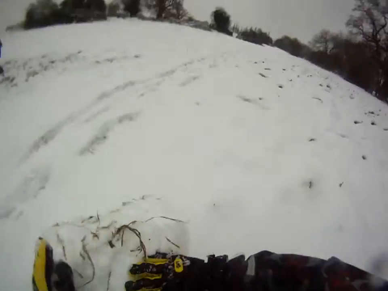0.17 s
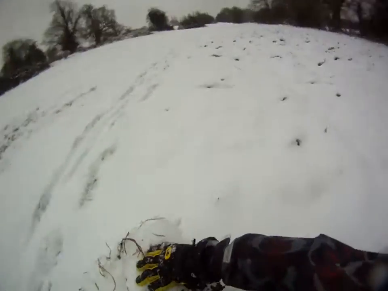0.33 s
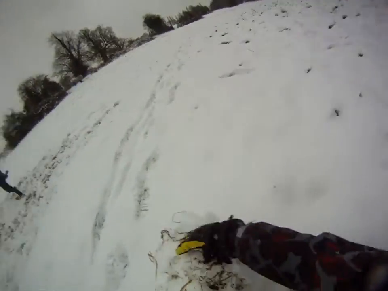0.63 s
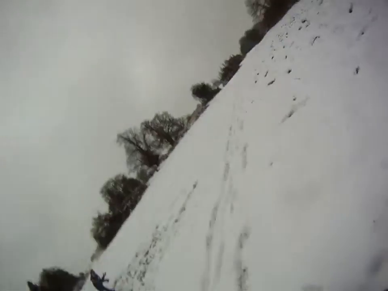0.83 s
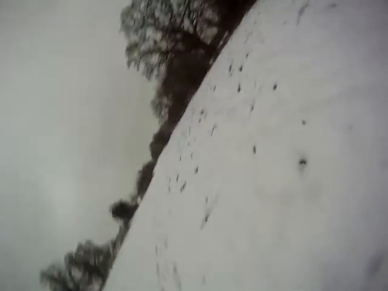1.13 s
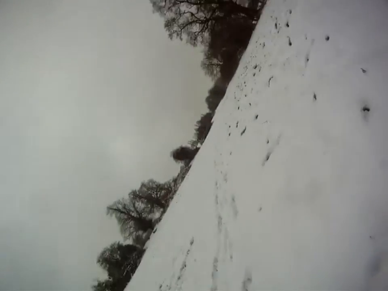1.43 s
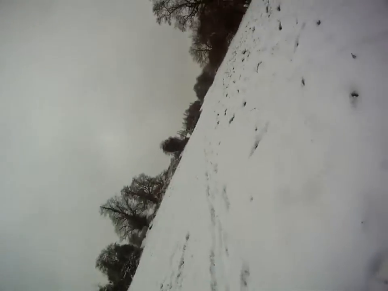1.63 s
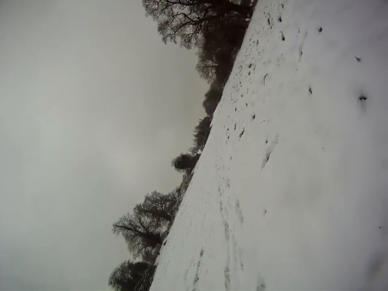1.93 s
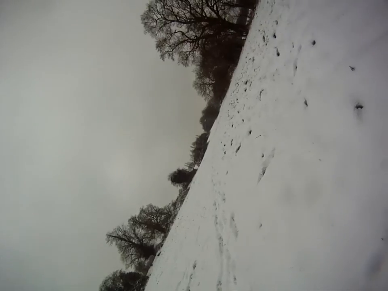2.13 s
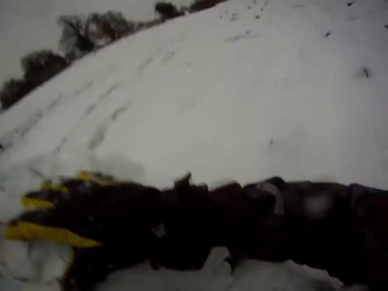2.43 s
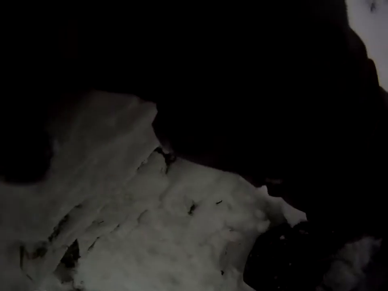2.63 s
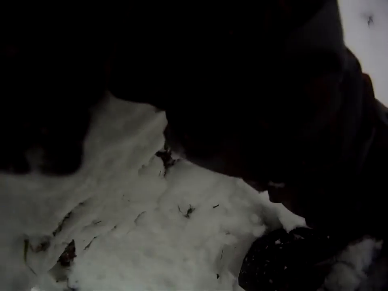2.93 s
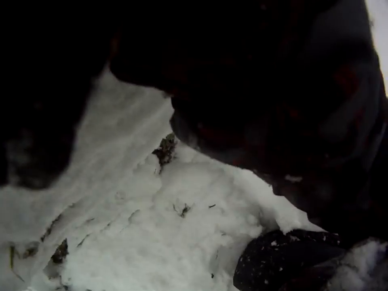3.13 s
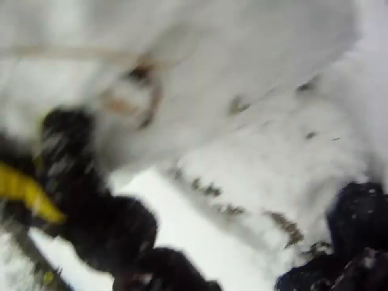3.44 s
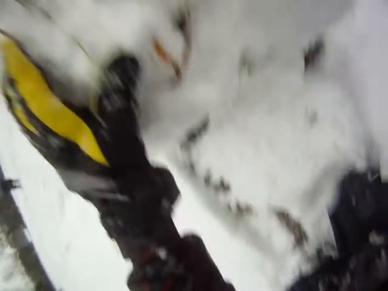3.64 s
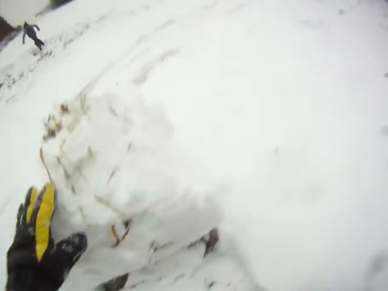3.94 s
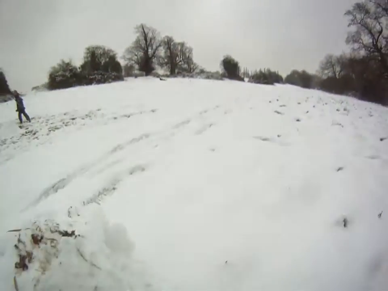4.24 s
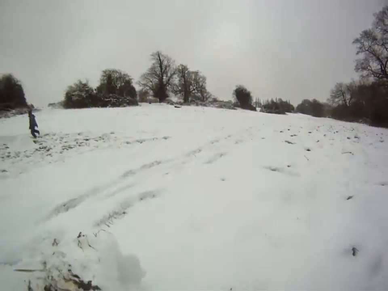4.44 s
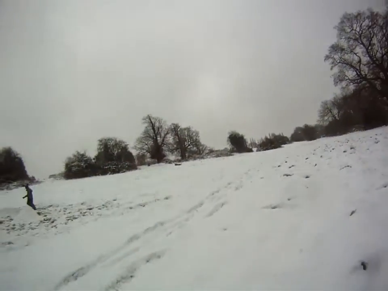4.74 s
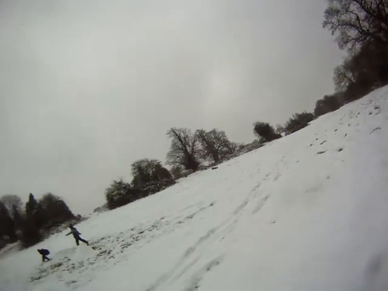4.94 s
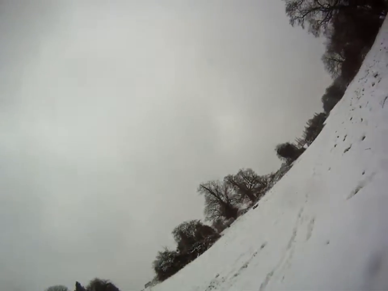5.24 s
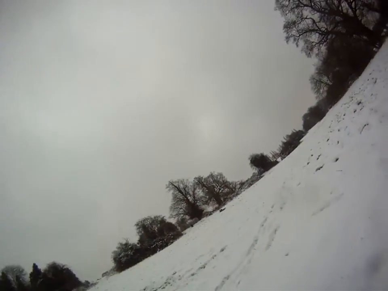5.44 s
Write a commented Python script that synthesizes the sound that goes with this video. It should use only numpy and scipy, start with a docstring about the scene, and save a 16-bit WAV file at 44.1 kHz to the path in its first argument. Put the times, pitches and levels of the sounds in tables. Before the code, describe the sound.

Gloved hands crunch and pack snow in irregular bursts, with brittle snaps, dull bumps on the microphone casing and one hard knock.

```python
"""Gloved hands scoop and pack snow beside a small camera in a plastic case.
Crunches, snaps and sprays are bursts of noise filtered by damped resonances of the case or of fine ice.
Sleeves jolt the case with pressure pulses and rumble; one hard knock on it is a coloured burst with a bounce.
The recorder adds hiss, samples slowly and holds each sample, so the sound is mirrored into the treble."""
import sys
import numpy as np
from scipy import signal
from scipy.fft import rfft, irfft
from scipy.io import wavfile
from scipy.ndimage import uniform_filter1d

SR = 44100
rng = np.random.default_rng(int(sys.argv[2]) if len(sys.argv) > 2 else 0)


def pcm_store(signal):
    """Save signal as 16-bit PCM."""
    levels = np.round(np.clip(np.atleast_2d(signal), -1, 1) * 32767)
    wavfile.write(sys.argv[1], SR, levels.astype(np.int16).T)


def nominal_scale(level):
    """Amplitude ratio for a level in decibels (scalar or array-like)."""
    x = np.asarray(level, float) / 20
    return 10 ** x


N = 246078  # length in samples

# jolts of the case: deepest_push_s, push_level_db, push_time_constant_ms
CASE_JOLTS = [(0.19, -34.5, 3.4), (0.31, -26, 0.68), (0.351, -35.5, 3), (0.595, -30, 0.58),
              (0.946, -29.5, 0.17), (.975, -32.5, 1.4), (1.076, -31.5, 3.8), (1.226, -19.5, 1.9),
              (1.276, -19.5, 0.41), (1.307, -12, 2.04), (1.833, -27, 0.17), (2.066, -36.5, 0.19),
              (2.514, -28.5, 0.74), (2.526, -24.5, 1.06), (2.691, -36, 1.2), (3.367, -36, 1.8),
              (3.449, -35.5, 0.88), (3.495, -32.5, 0.53), (3.631, -25, 1.75), (3.676, -23.5, 1.7),
              (3.714, -33, 0.76), (3.799, -18.5, 0.83), (3.833, -22, 2), (4.324, -23.5, 1.24),
              (4.528, -24.5, 0.87), (4.679, -23.5, 1.5), (4.713, -25, 0.58), (4.757, -28, 1.8),
              (5.031, -36, 1.7), (5.064, -28.5, 2.4), (5.113, -36.5, 1.8)]
# resonances of the plastic case, the upper ring last: frequency_hz, width_hz, gain_db
CASE_MODES = [(1255, 365, 5), (2006, 298, 14.5), (2960, 610, -20), (870, 100, -10), (3695, 493, 9.5)]
CASE_TOP_HZ = 3630  # the case's rings are steeply dulled above this
# resonances of the finest ice: frequency_hz, width_hz, gain_db
FIZZ_MODES = [(5100, 1330, 18), (4560, 400, -2.5)]


def evened(x):
    """Normalisation: scales a signal to unit rms."""
    return x / np.sqrt(np.mean(x ** 2) + 1e-20)


def add(mix, s, sound):
    """Superposition: adds a sound to the mix in place, from time s on."""
    part = mix[round(s * SR):][:len(sound)]
    part += sound[:len(part)]


def ring(x, modes, top_hz=SR):
    """Modal resonance: a sum of damped second-order band-passes, steeply dulled above top_hz."""
    f = np.fft.rfftfreq(len(x), 1 / SR)
    gain = 0
    for hz, width, db in modes:
        damping = 1j * f * width
        gain = gain + nominal_scale(db) * damping / (hz ** 2 - f ** 2 + damping)
    rolloff = 1 + (f / top_hz) ** 20
    return irfft(rfft(x) * gain / rolloff, len(x))


def colour(x, points):
    """Spectral shaping: filters x by a gain curve over log frequency, then sets unit rms."""
    hz, db = np.transpose(points)
    f = np.fft.rfftfreq(len(x), 1 / SR)
    gain = nominal_scale(np.interp(np.log(f + 1), np.log(hz), db))
    return evened(irfft(rfft(x) * gain, len(x)))


def swell(ms, size):
    """Impulse envelope: a rounded rise to 1 at twice the time constant ms, and a slightly longer fall."""
    u = np.arange(size) * 1000 / SR / np.clip(ms, .2, 12)
    return (u / 2) ** 2 * np.exp(2 - u)


def grains(per_s, spread_db, ms, bed):
    """Shot noise: random puffs, a few of them large, over a steady bed (power re the puffs' mean)."""
    sizes_db = spread_db * np.minimum(rng.exponential(1, N), 2.5)
    impulses = nominal_scale(2 * sizes_db) * (rng.random(N) < per_s / SR)
    puffs = abs(signal.oaconvolve(impulses, swell(ms, size=4096))[:N])
    power = bed + puffs / puffs.mean()
    return np.sqrt(power) * rng.standard_normal(N)


def gesture(s, db, rise_db_per_s, fall_db_per_s):
    """Exponential onset and decay: power along the points, with steady dB slopes before and after."""
    t = np.arange(N) / SR
    before_db = rise_db_per_s * np.maximum(s[0] - t, 0)
    after_db = fall_db_per_s * np.maximum(t - s[-1], 0)
    return nominal_scale(2 * (np.interp(t, s, db) - before_db - after_db))


def effort():
    """Adding powers: the amplitude with which the gloves work the snow, from all their moves."""
    # short strokes of a glove through the snow: start_s, length_s, start_level_db, change_db
    strokes = [(0, 0.0057, -45, 0), (0.094, 0.057, -44, -3.5), (0.216, 0.011, -42, -3),
               (0.315, 0.011, -40, -4), (0.377, 0.082, -45.5, -13), (0.588, 0.2, -42.5, -30.5),
               (0.766, 0.24, -67, 36.5), (1.071, 0.053, -36.5, -4.5), (1.168, .04, -51, -2),
               (1.254, 0.069, -22.5, -2), (1.42, 0.15, -30, -21), (1.6, 0.029, -51.5, 5),
               (1.682, .07, -49, -2), (1.784, 0.053, -37.5, 3), (1.924, .03, -48, 1.5),
               (2.048, 0.027, -49, 0), (3.107, 0.13, -40, -5.5), (3.308, 0.053, -37.5, -4),
               (3.389, 0.048, -53.5, 4.5), (3.491, 0.091, -42.5, -9), (4.905, 0.18, -59.5, 18),
               (5.138, 0.039, -43, 3)]
    # long squeezes, the pressure swelling and easing, one curve each: time_s, level_db
    squeezes = [
        [(2.325, -42.5), (2.395, -47), (2.407, -32), (2.425, -35.5), (2.526, -34.5), (2.668, -50),
         (2.72, -45.5), (2.94, -46.5)],
        [(3.61, -42), (3.704, -35.5), (3.73, -40.5), (3.763, -32), (3.99, -51.5)],
        [(4.043, -36), (4.306, -37.5), (4.422, -45.5), (4.524, -39.5), (4.562, -41.5), (4.653, -31),
         (4.763, -43.5), (4.867, -50)],
    ]
    grip_db_per_s, let_go_db_per_s = 686, 491.5
    rustle_db = -62.5  # faint rustle between the moves
    moves = [([s, s + length], [db, db + change_db]) for s, length, db, change_db in strokes]
    moves += [np.transpose(curve) for curve in squeezes]
    power = nominal_scale(2 * rustle_db)
    for s, db in moves:
        power = power + gesture(s, db, grip_db_per_s, let_go_db_per_s)
    return np.sqrt(power)


def hiss():
    """Stationary noise: random samples coloured by a fixed spectrum."""
    # hiss of the recorder: frequency_hz, relative_density_db
    spectrum = [(30, -0.5), (100, -9.5), (700, -16), (4500, -26.5), (5900, -24.5)]
    level_db = -57.5  # rms
    return nominal_scale(level_db) * colour(rng.standard_normal(N), spectrum)


def shake():
    """Carried vibration: the case shakes with the arms' work and round each jolt, more for long pushes."""
    rest_db, carry_db = -66, -15.5  # resting level; share of the gloves' work that reaches the case
    around_db, length_power = -18, 0.16  # re the jolt, for a 1 ms time constant; growth with it
    build_db_per_s, settle_db_per_s = 600.5, 198
    power = nominal_scale(2 * rest_db) + (nominal_scale(carry_db) * effort()) ** 2
    for s, db, ms in CASE_JOLTS:
        around = gesture([s], [db + around_db], build_db_per_s, settle_db_per_s)
        power = power + ms ** (2 * length_power) * around
    return np.sqrt(power)


def jolts():
    """Pressure pulses: each pushes the diaphragm in and lets it swing back, over a lumpy rumble."""
    # the hollow of the case, rung by each jolt: frequency_hz, width_hz, gain_db
    thud = [(220, 53, -5.5)]
    # spectrum of the rumble: frequency_hz, relative_density_db
    rumble_tone = [(15, -13.5), (31, -1.5), (100, -8.5), (230, -14), (340, -18), (450, -32.5), (700, -49)]
    rebound_hz = 32  # the high-pass that makes the diaphragm swing back
    pushes = np.zeros(N)
    for s, db, ms in CASE_JOLTS:
        add(pushes, s - 2 * ms / 1000, -nominal_scale(db) * swell(ms, size=4096))
    rebound = signal.butter(2, rebound_hz, "high", fs=SR, output="sos")
    swings = signal.sosfilt(rebound, pushes + ring(pushes, thud))
    rumble = colour(grains(per_s=23, spread_db=6.5, ms=7.4, bed=0.24), rumble_tone)
    return swings + shake() * rumble


def knock():
    """Impact noise: something hard rattles on the case for a moment and bounces once."""
    # the blow and its bounce: peak_s, level_db
    blows = [(3.4526, -4), (3.46, -17)]
    # spectrum of the rattle: frequency_hz, relative_density_db
    tone = [(120, -33), (200, -24.5), (436, -45), (1160, -20), (1850, -5.5), (3210, -7), (3650, 3),
            (4030, -14.5), (4570, -2.5), (5900, -16), (7670, -56.5), (13000, -120)]
    rise_db_per_s, fall_db_per_s = 2301, 2796
    lead_s, last_s, edge_s = 0.0061, 0.0095, 0.0011  # contact before and after the blow; its soft edges
    power = sum(gesture([s], [db], rise_db_per_s, fall_db_per_s) for s, db in blows)
    t = np.arange(N) / SR - blows[0][0]
    inside_s = np.minimum(t + lead_s, last_s - t)
    contact = np.clip(inside_s / edge_s + .5, 0, 1) ** 2
    # the repeating noise pattern is longer than the contact
    rattle = np.resize(colour(rng.standard_normal(1024), tone), N)
    return contact * np.sqrt(power) * rattle


def sprays():
    """Clustered excitation: loose ice dust brushes past as ticks of noise that ring the fine ice."""
    # short sprays of fine icy fizz: time_s, peak_db
    spray_list = [(0.0924, -36.5), (0.2633, -37), (0.3051, -30), (0.3733, -29), (0.582, -39),
                  (0.948, -31.5), (1.7546, -38), (1.8238, -34), (2.434, -33), (2.556, -34.5), (2.6998, -35),
                  (3.1186, -36.5), (3.3565, -28.5), (3.7125, -17), (3.8994, -41), (3.937, -40),
                  (4.399, -40), (4.5087, -32.5), (4.8, -34.5), (4.8623, -35.5)]
    out = np.zeros(N)
    envelope = swell(3.36, size=4096)  # time constant in ms
    # each tick holds one random strength for 64 samples, mostly weak
    ticks = np.repeat(rng.random((len(spray_list), 64)) ** 2.4, 64, axis=1)
    puffs = ticks * rng.standard_normal(ticks.shape)
    for (s, db), puff in zip(spray_list, puffs):
        sound = ring(puff * envelope, FIZZ_MODES)
        add(out, s - .003, nominal_scale(db) * sound / abs(sound).max())
    return out


def snaps():
    """Impulse response: each snap of the crust is one puff, shared by the lower rings and the upper ring."""
    # crust snapping: time_s, lower_rings_peak_db, upper_ring_re_lower_db
    snap_list = [(0.212, -28, -24), (0.221, -28, -26), (.233, -32, -3), (0.593, -35, 1.5), (.828, -47, 9),
                 (.948, -26.5, -3), (0.99, -17, -10), (1.003, -21, -17), (1.187, -24, -7),
                 (1.251, -15.5, -3), (1.298, -10, -7), (1.42, -39, -24), (1.493, -25, -0.5),
                 (1.598, -34, 1), (1.722, -27.5, -13), (1.777, -26, -7), (1.794, -21, -12),
                 (1.873, -34, 2.5), (2.066, -31, -12), (2.228, -39.5, -17), (2.321, -30.5, -22),
                 (2.366, -25, -17), (2.406, -23, -14), (2.43, -26.5, 2), (2.614, -25.5, -1.5),
                 (2.688, -22.5, -22), (2.701, -21, -13), (2.716, -27.5, -24), (2.766, -26, -11),
                 (3.033, -43.5, -26), (3.101, -26.5, -18), (3.357, -23.5, -8), (3.683, -20, -20),
                 (3.69, -15, -24), (3.713, -16.5, 5), (3.754, -14.5, -41), (3.799, -29.5, 9),
                 (4.372, -28.5, -25), (4.715, -23, -2), (4.812, -34, 11), (4.835, -33, 1.5),
                 (4.866, -33.5, 0.5), (4.911, -40.5, -4), (4.961, -37, -7), (5.067, -23, -9),
                 (5.139, -33, -7), (5.18, -30, -5)]
    shortest_ms, spread = 0.6, 0.83  # time constant; the longest is e ** spread times the shortest
    out = np.zeros(N)
    lengths_ms = shortest_ms * np.exp(spread * rng.random(len(snap_list)))
    puffs = rng.standard_normal((len(snap_list), 2048))
    for (s, db, upper_db), ms, puff in zip(snap_list, lengths_ms, puffs):
        burst = puff * swell(ms, size=2048)
        for modes, part_db in ((CASE_MODES[:-1], 0), (CASE_MODES[-1:], upper_db)):
            sound = ring(burst, modes, CASE_TOP_HZ)
            add(out, s - .001, nominal_scale(db + part_db) * sound / abs(sound).max())
    return out


def crunch():
    """Forced resonance: breaking crystals ring the case; the finest of them fizz faintly above it."""
    drift_db, drift_ms, thin_hz = 3.0, 60, 600  # rms wander of each ring; its smoothing; high-pass
    fizz_db, pivot_db = -18, -43.5  # fizz re the crunch, at this level of effort
    fizz_growth = 1.01  # hard crunches fizz slightly more: power of the effort
    drive = grains(per_s=390, spread_db=5.5, ms=0.74, bed=0.8)
    span = round(drift_ms * SR / 1000)
    body = 0
    for mode in CASE_MODES:  # as the hands move about, each ring is excited more or less
        wander = uniform_filter1d(rng.standard_normal(N), span)
        drift = evened(uniform_filter1d(wander, span))
        body = body + ring(nominal_scale(drift_db * drift) * drive, [mode], CASE_TOP_HZ)
    high_pass = signal.butter(2, thin_hz, "high", fs=SR, output="sos")
    thin = signal.sosfilt(high_pass, body)
    fine = ring(grains(per_s=260, spread_db=4.0, ms=0.99, bed=0.51), FIZZ_MODES)
    work = effort()
    fizz = nominal_scale(fizz_db) * (work / nominal_scale(pivot_db)) ** (fizz_growth - 1) * evened(fine)
    return work * (evened(thin) + fizz)


def scene():
    """Superposition: the sum of all sources, as one channel."""
    return (hiss() + jolts() + knock() + sprays() + snaps() + crunch())[None]


def roll_off(x):
    """The treble ends steeply here."""
    return signal.sosfilt(signal.butter(12, 16230, fs=SR, output="sos"), x)


def record(dry):
    """Sample and hold: 12000 samples a second, each held until the next, mirror the spectrum."""
    sample_edge_hz, top_edge_hz = 5900, 15250  # low-passes before sampling and after holding
    smoothing = signal.butter(8, sample_edge_hz, fs=SR, output="sos")
    smooth = signal.sosfiltfilt(smoothing, dry)
    slow = signal.resample_poly(smooth, 40, 147, axis=1, window=("kaiser", 9))  # to 12000 Hz
    steps = np.repeat(slow, 4, axis=1)  # held, at 48000 Hz
    held = signal.resample_poly(steps, 147, 160, axis=1)[:, :N]  # back to SR
    edge = signal.firwin(201, top_edge_hz, window=("kaiser", 3.5), fs=SR)
    mix = np.clip(signal.oaconvolve(held, edge[None], "same"), -1, 1)
    return roll_off(mix)


dry = scene()
out = record(dry)
pcm_store(out)
```